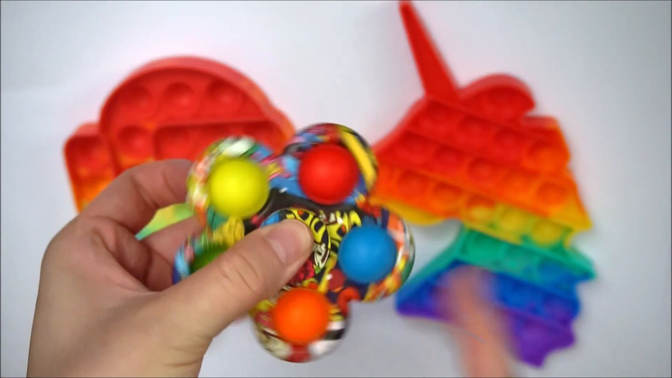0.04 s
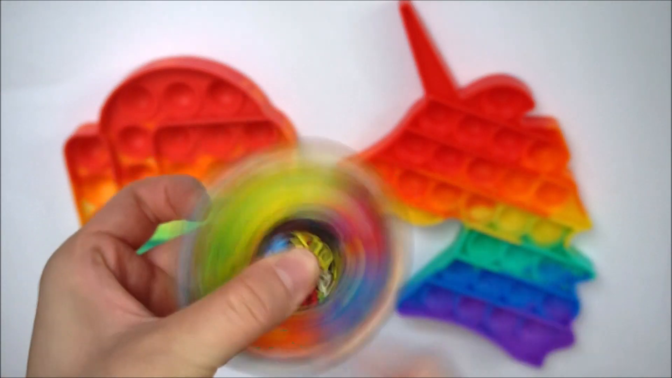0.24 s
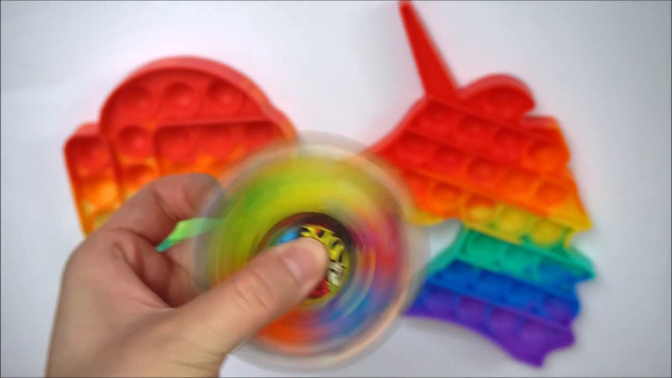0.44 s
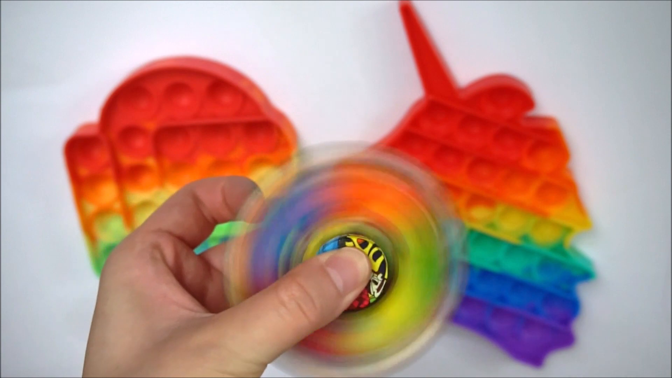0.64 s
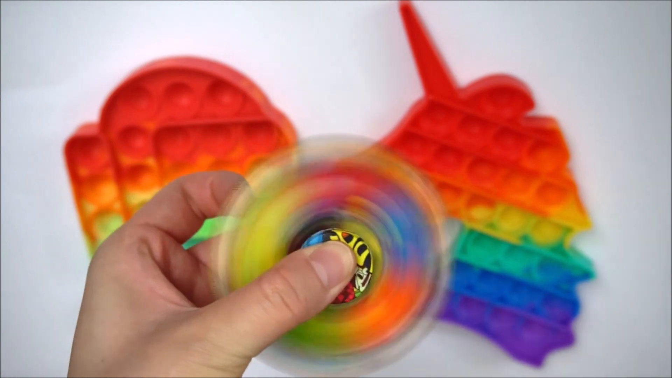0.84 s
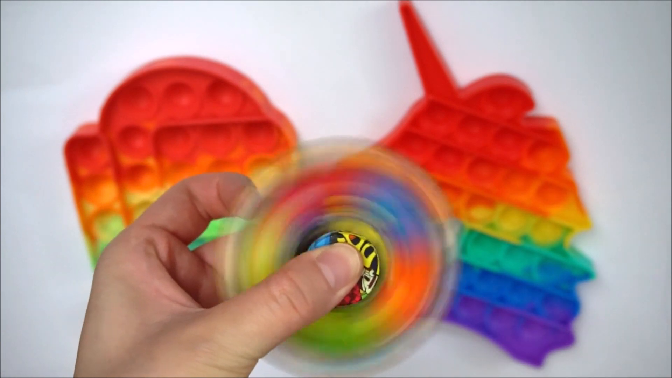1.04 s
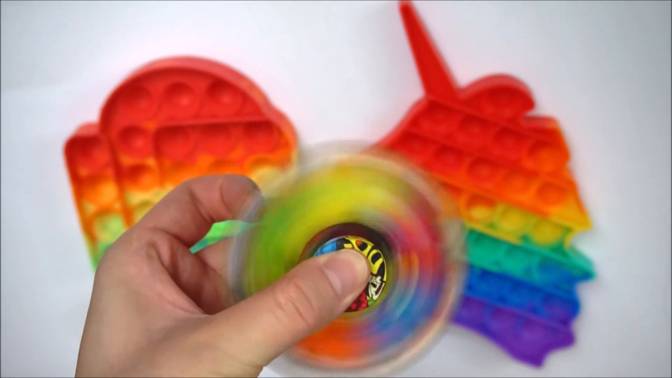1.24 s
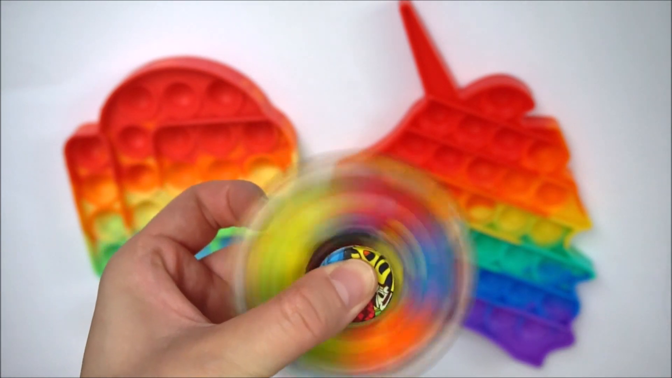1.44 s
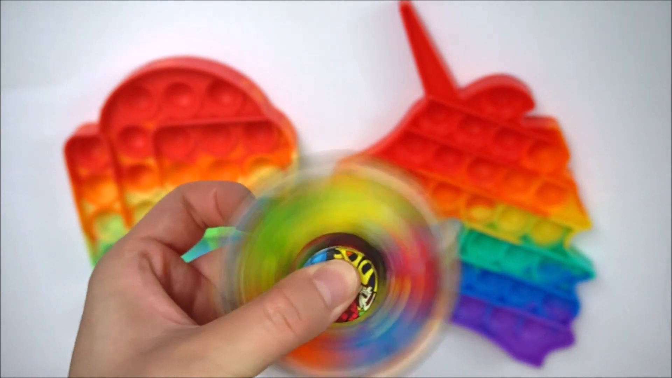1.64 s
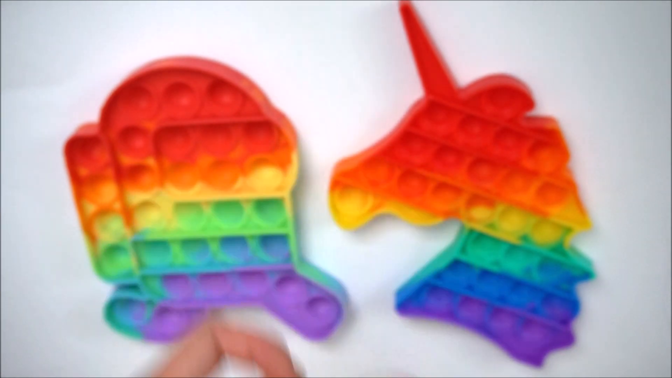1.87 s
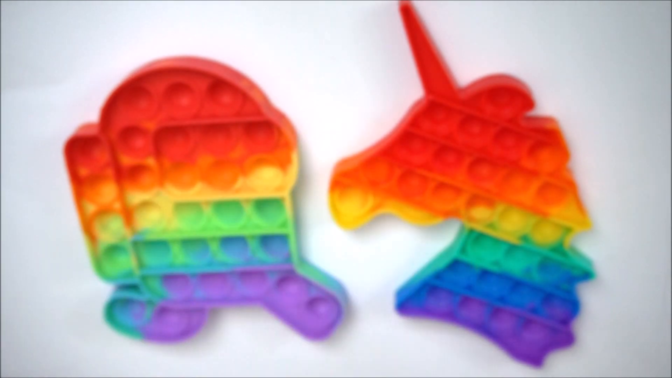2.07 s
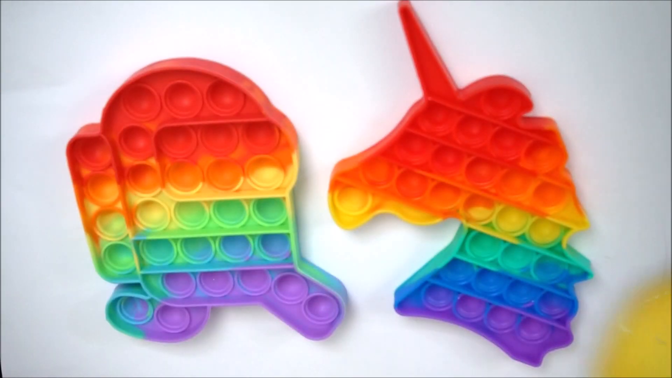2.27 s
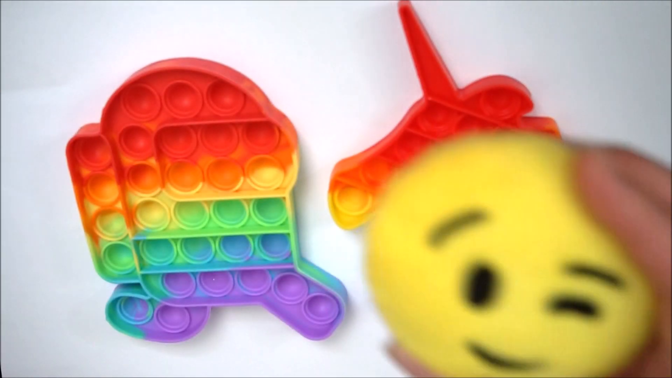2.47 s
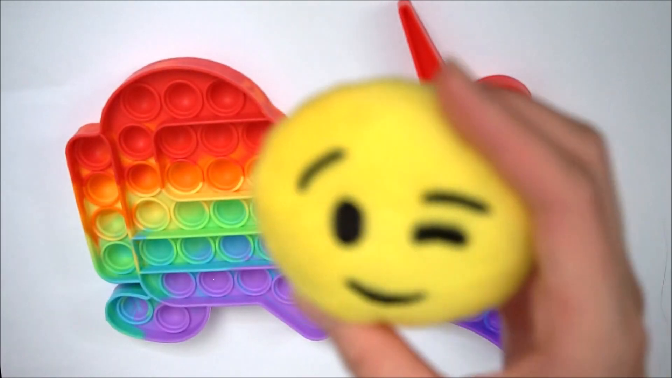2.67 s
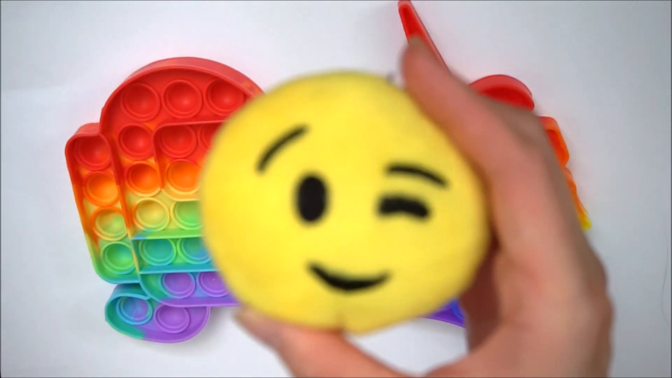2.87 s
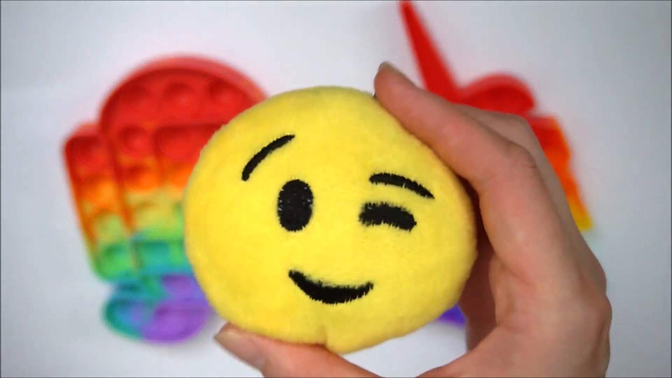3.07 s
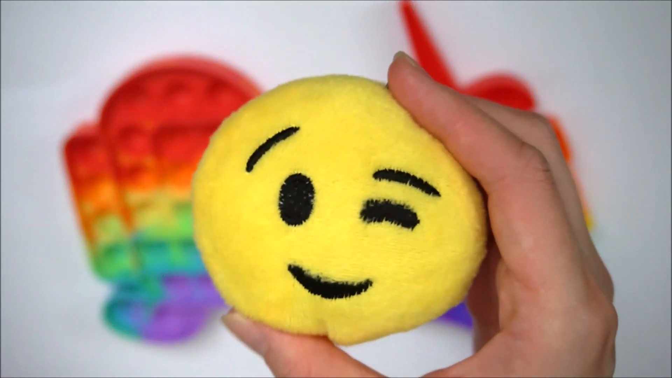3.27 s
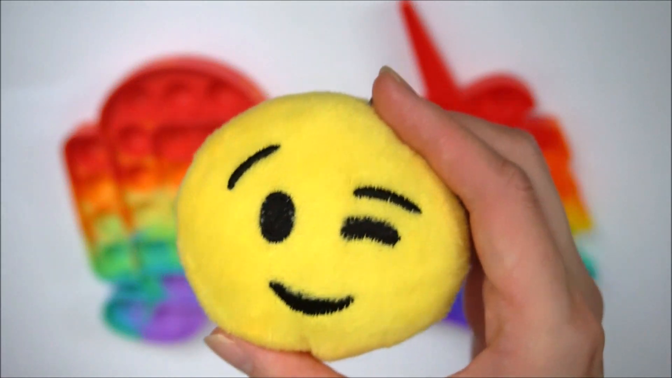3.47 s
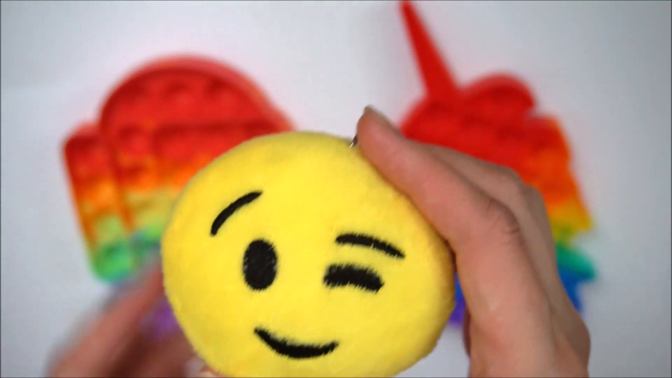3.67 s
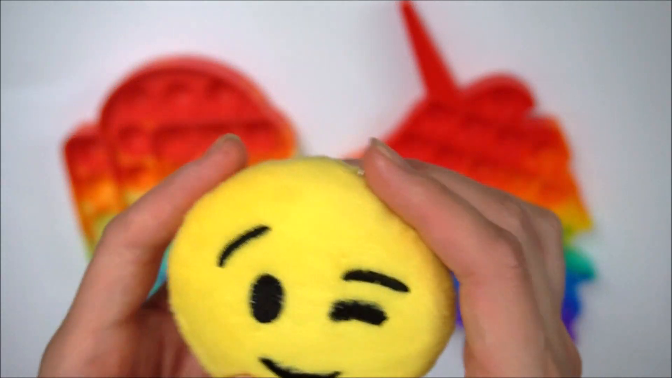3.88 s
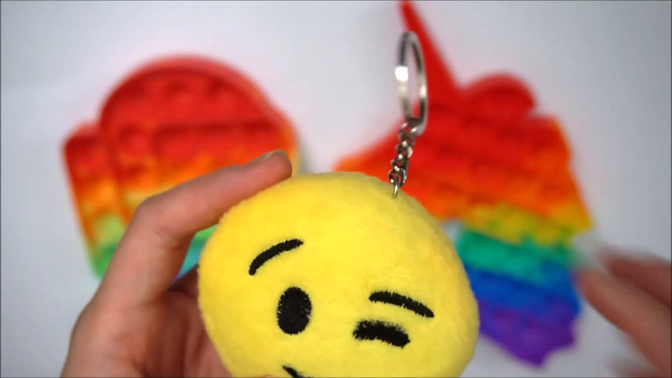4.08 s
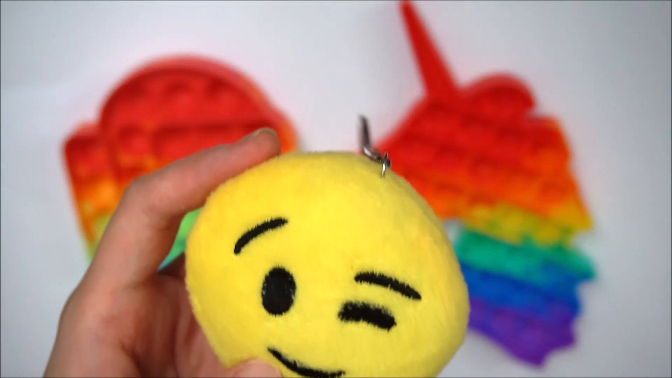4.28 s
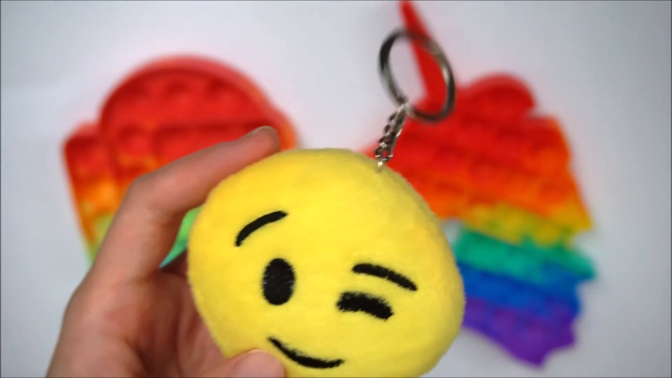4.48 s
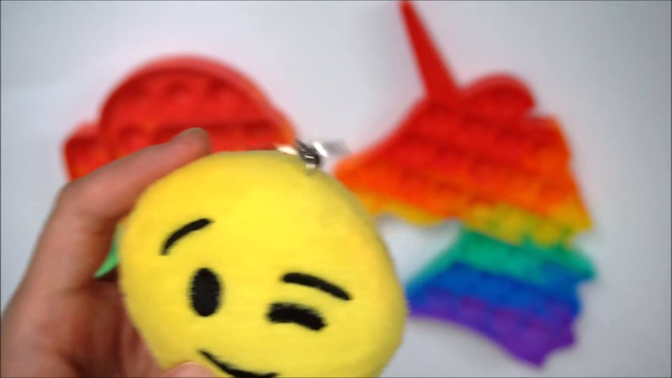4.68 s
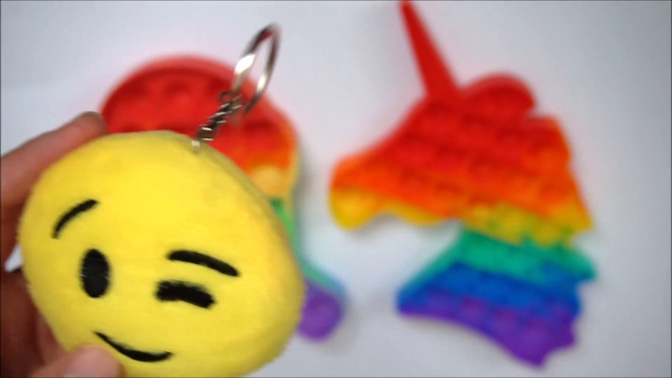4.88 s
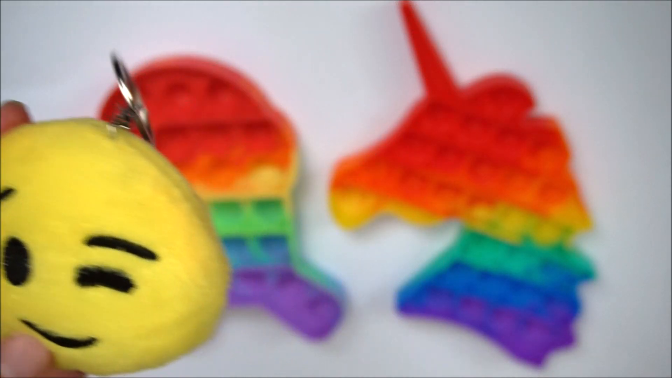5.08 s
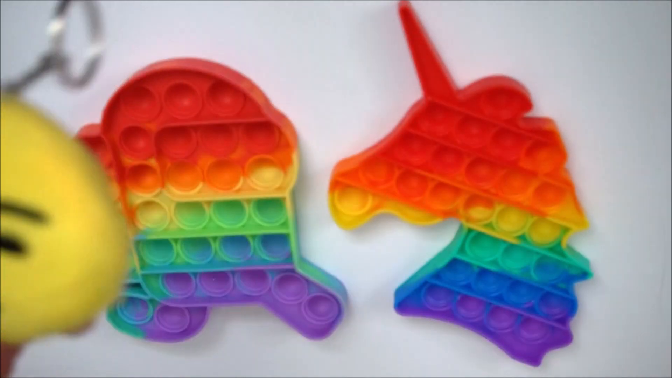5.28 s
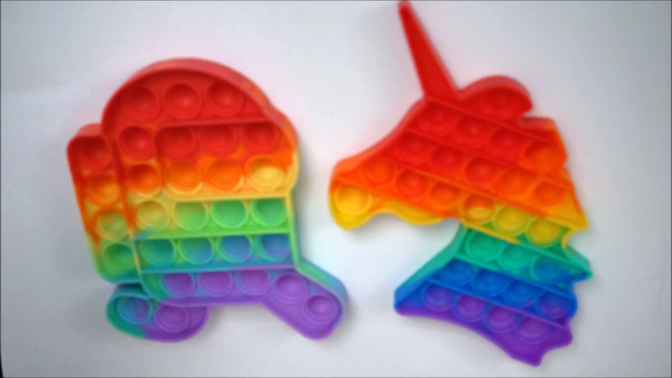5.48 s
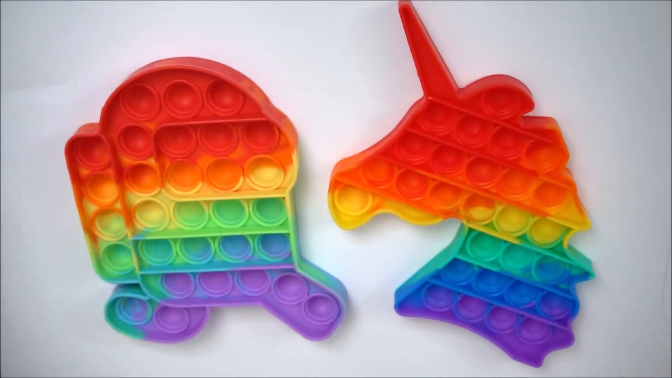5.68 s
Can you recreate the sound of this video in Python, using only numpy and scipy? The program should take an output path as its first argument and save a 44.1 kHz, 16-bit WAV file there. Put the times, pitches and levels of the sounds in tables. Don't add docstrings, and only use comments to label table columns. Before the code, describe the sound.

A plastic fidget spinner is flicked with sharp clicks, whirs and rattles for two seconds, thuds onto a table, then plush rustles faintly.

```python
import sys
import numpy as np
from scipy import signal
from scipy.io import wavfile
from scipy.ndimage import uniform_filter1d

SR = 44100
rng = np.random.default_rng(int(sys.argv[2]) if len(sys.argv) > 2 else 0)


def dump(signal):
    limited = np.clip(np.atleast_2d(signal).T, -1, 1)
    pcm = np.round(limited * 32767).astype(np.int16)
    wavfile.write(sys.argv[1], SR, pcm)


def field_ratio(decibels):
    return 10 ** (np.asarray(decibels, dtype=float) / 20)


N = 252252

# pitch_hz, level_db
ROOM_COLOUR = [(15, -38), (25, -22), (39, -5.5), (114, -2.5), (259, -9), (553, -12.5), (706, -15),
               (854, -14.5), (1180, -19), (1640, -19.5), (1980, -21), (4360, -24.5), (8600, -27.5),
               (15200, -28), (16500, -55)]
# time_s, level_db
ROOM_SWELL = [(0.0, -0.5), (5.72, 0.5)]
# pitch_hz, side_over_middle_db
ROOM_WIDTH = [(60, -16), (130, -8), (290, -1), (640, 2), (1410, 3.5), (3100, 1), (6820, -0.5), (15000, 0.5)]
NEAR_WIDTH = [(60, -11), (110, -26), (200, -21), (380, -6), (700, -8), (1290, -21), (2380, -15),
              (4400, -12), (8120, -11.5), (15000, -8)]
# pitch_hz, level_db
ECHO_COLOUR = [(20, -40), (500, 0), (21000, -2)]

# pitch_hz, width_hz, level_db
TABLE_THUD = [(108.2, 21, 4.5), (155, 45, -3.5)]
TABLE_KNOCK = [(211, 82, 2), (270, 140, -13), (368, 110, -2), (480, 68, -35)]
# crest_s, wobble_db, hand_stops_it_s
PUSHES = [
    (2.21, -37, 2.2),
    (2.3, -39, 2.62),
    (2.54, -39.5, 2.72),
    (2.81, -49.5, 3.04),
    (2.95, -54, 3.0),
    (3.05, -55, 3.09),
    (5.36, -49, 5.7),
]
# crest_s, thud_db, knock_over_thud_db, die_away_s (time to fall 60 dB)
JOLTS = [
    (2.13, -49, 12.5, 0.79),
    (2.192, -32.5, 5, 0.43),
    (2.29, -42.5, -11, 0.25),
    (2.401, -46.5, -6, 1),
    (2.54, -56, -1.5, 1),
    (2.71, -59, 9, 0.23),
    (3.05, -65, -17, 0.27),
    (5.355, -56, 8, 0.23),
    (5.4, -53.5, -3, 0.96),
    (5.64, -57, -2, .5),
]

# pitch_hz, level_db
FINE_COLOUR = [(2940, -22), (5000, -13), (6780, -2), (8490, -2), (13300, -3), (15900, -4), (16300, -14),
               (16500, -47)]
COARSE_COLOUR = [(290, -24), (500, -8), (662, -6.5), (860, -8.5), (1380, -14.5), (1620, -12.5), (2980, -13),
                 (5500, -18), (7150, -30), (12100, -120)]
# middle_s, length_s, fine_db, coarse_over_fine_db
STROKES = [(2.254, 0.18, -56.5, -3.5), (2.346, 0.14, -50.5, -13), (2.47, 0.18, -55, -9),
           (2.574, 0.15, -54.5, -13), (2.69, 0.24, -51, -18), (2.858, .18, -60, -18.5),
           (3.215, 0.2, -58, -1), (3.932, 0.35, -63.5, 0), (4.273, 0.072, -74, 11),
           (4.402, 0.062, -64, -14), (4.48, 0.26, -69, 10), (4.73, 0.19, -64, 7.5), (4.821, 0.1, -64, 6),
           (4.98, .12, -64, -1), (5.15, 0.18, -62, -6), (5.304, 0.089, -63, -6), (5.502, 0.32, -69, -19)]
# start_s, end_s
HOLDS = [(2.2, 3.4), (4.3, 5.6)]

# start_s, peak_db, pitch_hz, die_away_s
TAPS = [(.015, -53, 6140, 0.17), (.155, -41, 3600, 0.022), (.258, -22, 8600, .11), (.2705, -21, 4250, 0.04),
        (2.232, -30, 6700, 0.01), (2.243, -36, 7000, 0.058), (3.155, -40, 2100, 0.026),
        (2.232, -37.5, 3360, 0.017), (3.166, -42, 2890, .04), (3.176, -36.5, 2470, 0.048),
        (3.188, -46, 3160, .035), (3.213, -39.5, 2510, 0.065), (3.213, -50, 4400, .07),
        (4.455, -38.5, 406, 0.039), (4.455, -47, 955, 0.074)]
HOLLOW_BLOWS = [(.2458, -31, 277, 0.047), (.2462, -27, 480, 0.047), (.2462, -35, 750, .03),
                (.2462, -38, 1100, .025), (.2692, -44, 520, .025), (.2692, -38, 784, 0.02),
                (.2692, -44, 1190, 0.022), (.2905, -39, 700, .06), (.313, -36, 860, 0.021),
                (.313, -40, 480, 0.037), (4.706, -45, 960, .08), (4.722, -38, 810, .09),
                (4.723, -39, 1150, 0.076), (4.721, -42.5, 1844, 0.057), (4.738, -34, 884, 0.067),
                (4.742, -46, 1624, 0.18), (4.76, -42, 880, .1), (4.82, -52, 1590, .07)]
LANDING_BLOWS = [(2.115, -39, 260, 0.21), (2.16, -29, 150.3, 0.15), (2.168, -31.5, 202.6, 0.19),
                 (2.19, -36, 115, .09), (2.19, -43, 305, 0.088), (2.208, -25.5, 219, 0.13),
                 (2.262, -33, 88, 0.17), (2.268, -32, 184.3, 0.16), (2.45, -45.5, 257, 0.15),
                 (2.94, -50, 105, .2), (3.02, -43, 93, 0.18)]
ROUGH_BLOWS = [
    (2.12, -49, 437, 0.092),
    (2.125, -35, 140, .15),
    (2.172, -38, 366, 0.18),
    (2.175, -47, 446, 0.15),
    (3.175, -46, 430, 0.36),
    (3.18, -45, 4400, 0.16),
    (4.724, -47, 2450, 0.059),
    (4.725, -48, 1450, 0.07),
]

# start_s, peak_db, ring_hz, dull_body_over_crack_db
FLICK_CLICKS = [(.156, -48, 7780, 7.5), (.1699, -41.5, 9860, -1), (.2445, -24, 9000, -14),
                (.2463, -3.5, 9600, -7.5), (.248, -20, 9000, -7), (.2496, -9.5, 7500, -8),
                (.2515, -18, 7600, -10), (.2535, -19, 7900, -10), (.2665, -23, 8500, -22),
                (.2692, -3.5, 13200, -17), (.2708, -15.5, 8500, -15), (.2725, -9, 8600, -3),
                (.2742, -13, 9360, -11), (.2765, -18, 9000, -14), (.279, -24, 7940, -10),
                (.284, -20, 9000, -10), (.29, -19, 6800, -7), (.2915, -12, 6960, -9), (.294, -14, 6700, -8),
                (.3011, -12, 7560, -2), (.3035, -22, 7560, -5), (.3138, -14, 7300, -8.5),
                (.3165, -12, 7500, -1), (.3266, -17, 7700, -12)]
LATE_SPINNER_CLICKS = [(1.9225, -27, 13500, -45), (1.9995, -15, 13590, -30), (2.051, -17, 10400, -30),
                       (2.178, -32, 10100, -4), (2.1825, -24, 9700, -11), (2.2314, -27, 11700, -16),
                       (2.2421, -12.5, 7250, -24), (2.3555, -28, 9000, -7), (2.3987, -29, 8300, -7),
                       (2.4385, -37, 7850, -5), (2.4578, -36, 8700, -7), (2.4636, -21, 10300, -9),
                       (2.4707, -34, 8130, -18), (2.4932, -33, 7860, -7), (2.5425, -36, 6690, -9),
                       (2.5521, -33, 7500, -17), (2.5945, -35, 8650, -8)]
GRIP_CLICKS = [(3.154, -30.5, 11000, -18), (3.1574, -37, 9500, -10), (3.1662, -37, 8060, -7),
               (3.171, -40, 8000, -2), (3.1747, -29, 11800, -6), (3.1777, -21.5, 9600, -7),
               (3.1814, -34, 7940, -7), (3.184, -36, 7900, -5), (3.1865, -28, 8170, -8),
               (3.189, -27.5, 11000, -3), (3.1915, -33, 11000, -8), (3.1965, -38, 7540, -1),
               (3.2128, -34, 8100, -5), (3.2155, -40, 8100, -4), (3.2195, -45, 7000, -5),
               (3.2217, -41, 6470, 0), (3.2255, -46, 7000, -1)]
CHAIN_CLICKS = [(3.8931, -44.5, 5510, -5), (4.381, -45, 14000, -20), (4.4473, -42, 9950, -5),
                (4.4558, -41, 6450, -2), (4.483, -49, 9700, -6), (4.4637, -45, 6520, -2),
                (4.47, -38, 6640, -6), (4.4822, -37, 4500, -9), (4.7257, -42, 5300, 0),
                (4.9114, -46, 5700, -5), (4.9621, -37, 9700, -21), (4.9734, -44, 8770, -14),
                (5.6293, -42.5, 8890, -20)]
# pitch_hz, level_db
CRACK_COLOUR = [(3470, -13), (5900, 3.5), (6910, 2.5), (7520, 5), (9780, -7), (10900, -1), (11900, -9),
                (13100, 3), (16000, 0.5)]
DULL_COLOUR = [(88, -39), (150, -11), (455, -2), (768, 0), (1340, -20), (1660, -38), (1980, 2.5), (3450, 9),
               (4300, 9), (4900, 4), (6370, -8), (10800, -120)]

# time_s, level_db, turned_away (0 to 1), edge_ring_db
SPIN = [(.25, -44, 0.4, -28), (.3, -33, 0.42, -29), (.45, -29.5, 0.07, -23), (1.2, -29, 0.06, -12),
        (1.45, -29.5, 0.1, -8), (1.75, -30, 0.12, -7), (1.81, -31.5, 0.32, -6), (1.89, -31, .75, -3),
        (1.95, -31, 0.92, -8.5), (2.03, -33.5, 0.93, -15), (2.13, -38, 0.97, -16), (2.26, -49.5, 0.83, -23)]
# pitch_hz, width_hz, level_db
SHELL_TONES = [(2010, 152, 0), (2142, 120, 0.5), (2310, 350, 2), (2514, 530, -5.5)]
CAP_TONES = [(2770, 80, -10), (2830, 41, -1), (3216, 510, -0.5), (3670, 490, -8), (4400, 680, -6)]
BALL_TONES = [(5220, 1100, -12), (6090, 520, -1.5), (6450, 340, -0.5), (6800, 660, -4.5), (7300, 490, -0.5),
              (7600, 270, 5.5), (8100, 500, -4.5), (8680, 730, -4), (9700, 2500, -10), (12400, 1600, -10),
              (14700, 2100, -8), (15540, 1300, -8)]
HUB_TONES = [(354, 410, -9), (473, 376, -3), (736, 87, 2.5), (859, 82, -1), (1150, 245, -5)]
EDGE_TONES = [(2698, 250, -4), (2908, 210, -3.5)]
# pitch_hz, level_db
SIDE_COLOUR = [(150, -45), (250, -12), (386, -7.5), (421, -11), (493, -4), (1400, -21), (1880, -8),
               (2400, -30), (3170, -3.5), (4410, -6), (4990, -10.5), (7440, 0), (11900, -4.5),
               (13900, -0.5), (16000, -6.5)]
# start_s, peak_db
BALL_KNOCKS = [(0.3474, -18.5), (0.4559, -14.5), (0.4994, -20), (0.6025, -28), (0.6264, -20),
               (0.6484, -15.5), (0.6954, -20), (0.7224, -15), (0.8154, -26), (0.8579, -16), (0.8824, -16),
               (0.9034, -22), (0.9964, -17), (1.0206, -14), (1.0889, -17), (1.1134, -18), (1.1374, -18),
               (1.1574, -18), (1.1804, -25), (1.2376, -11), (1.2534, -26), (1.276, -19), (1.3154, -27),
               (1.3314, -18), (1.3964, -17), (1.4094, -22), (1.4214, -17), (1.4444, -16), (1.4594, -20),
               (1.493, -13.5), (1.5534, -16.5), (1.6167, -14), (1.6534, -17), (1.6894, -22), (1.7145, -22),
               (1.7424, -17), (1.8014, -13.5), (1.8347, -16), (1.8652, -16), (1.9034, -15.5), (1.9404, -14),
               (1.9714, -12), (1.9774, -21), (1.9844, -20), (2.0164, -17), (2.0284, -16), (2.0744, -31),
               (2.0834, -21), (2.1134, -24), (2.1324, -18)]


def evened(x):
    return x / np.sqrt(np.mean(x ** 2) + 1e-20)


def curve(rows, outside=-120.):
    s, *columns = np.transpose(rows)
    return [np.interp(np.arange(N) / SR, s, column, outside, outside) for column in columns]


def crest(s, rise, t60):
    t = np.arange(N) / SR - s
    swell = np.cos(np.pi / 2 * np.clip(t / rise, -1, 0)) ** 2
    return swell * field_ratio(-60 * np.maximum(t, 0) / t60)


def colour(x, points):
    hz, db = np.transpose(points)
    grid_hz = abs(np.fft.fftfreq(8192, 1 / SR))
    gain_db = np.interp(np.log(grid_hz + 1), np.log(hz), db, -70, -70)
    response = np.exp(np.conj(signal.hilbert(np.log(field_ratio(gain_db)))))
    taps = np.fft.ifft(response).real[:4096]
    return signal.oaconvolve(x, taps)[:len(x)]


def widened(x, points):
    return colour(x, [(20, points[0][1]), *points, (21000, points[-1][1])])


def pan(left_over_right_db):
    return field_ratio(left_over_right_db * np.array([[.5], [-.5]]))


def resonate(x, hz, width):
    r = np.exp(-np.pi * abs(width) / SR)
    return 2 * signal.lfilter([1 - r], [1, -r * np.exp(2j * np.pi * hz / SR)], x + 0j).real


def body(x, modes, sway_db=0):
    sway = rng.standard_normal((len(modes), len(x) // 256 + 2))
    sway = sway_db * evened(uniform_filter1d(sway, 20))
    at = np.arange(len(x)) / 256
    out = np.zeros(len(x))
    for k, (hz, width, db) in enumerate(modes):
        ring = resonate(resonate(x, hz, 1.21 * width), hz, 1.21 * width)
        level_db = db + np.interp(at, np.arange(len(sway[k])), sway[k])
        out += (-1) ** k * field_ratio(level_db) * ring
    return evened(out)


def grains(per_s, spread_db):
    draw = rng.random((N, 3))
    sign = np.sign(draw[:, 0] - .5)
    size = field_ratio(-spread_db * np.log(1.006 - draw[:, 1]))
    return sign * size * (draw[:, 2] < per_s / SR)


def add(mix, s, sound):
    part = mix[..., round(s * SR):][..., :sound.shape[-1]]
    part += sound[..., :part.shape[-1]]


def tail(t60, length):
    count = int(length * SR)
    x = rng.standard_normal(count) * field_ratio(-60 * np.arange(count) / SR / t60)
    return x / np.linalg.norm(x)


def room():
    mid, side = (colour(x, ROOM_COLOUR) for x in rng.standard_normal((2, N)))
    side = widened(side, ROOM_WIDTH)
    level_db = -52 + curve(ROOM_SWELL, 0)[0]
    return field_ratio(level_db) * np.array([mid + side, mid - side]) / mid.std()


def table():
    wobble_hz, wobble_rise_s, wobble_t60_s = 71.1, 0.073, 1.7
    hand_stop_s, jolt_rise_s = 0.024, 0.048
    shake, t = rng.standard_normal(N), np.arange(N) / SR
    thud, knock = body(shake, TABLE_THUD), body(shake, TABLE_KNOCK)
    swing = np.zeros(N)
    for s, db, stop in PUSHES:
        damping = np.clip((stop - t) / hand_stop_s, 0, 1)
        push = field_ratio(db) * crest(s, wobble_rise_s, wobble_t60_s) * damping
        swing = np.maximum(swing, push)
    out = np.sqrt(2) * swing * np.sin(2 * np.pi * wobble_hz * t)
    for s, db, knock_db, t60 in JOLTS:
        jolt = crest(s, jolt_rise_s, t60)
        out += field_ratio(db) * jolt * (thud + field_ratio(knock_db - 2.5) * jolt * knock)
    return out


def rustle():
    fine = evened(colour(grains(7000, 2.3), FINE_COLOUR))
    coarse = evened(colour(grains(6000, 1.0), COARSE_COLOUR))
    t = np.arange(N) / SR
    held = sum(1. * (t > start) * (t < end) for start, end in HOLDS)
    held = uniform_filter1d(held, SR // 5)
    out = held * field_ratio(-66) * (fine + coarse)
    for s, length, db, coarse_db in STROKES:
        stroke = np.cos(np.pi * np.clip((t - s) / length, -.5, .5)) ** 2
        out += field_ratio(db) * stroke * (fine + field_ratio(coarse_db) * coarse)
    return out


def blows_of(rows, rise_share, rough):
    out, t = np.zeros(N), np.arange(9000) / SR
    for s, db, hz, t60 in rows:
        noise = body(rng.standard_normal(9000), [(hz, 0.3 * hz, 0)])
        note = (1 - rough) * np.sin(2 * np.pi * hz * t) + 0.91 * rough * noise
        rise = rise_share * t60
        swell = np.sin(np.pi / 2 * np.minimum(t / rise, 1)) ** 2
        add(out, s, field_ratio(db - 60 * np.maximum(t - rise, 0) / t60) * swell * note)
    return out


def soft_blows():
    return (blows_of(TAPS, rise_share=0.091, rough=0.64)
            + blows_of(HOLLOW_BLOWS, rise_share=0.064, rough=0.34)
            + blows_of(LANDING_BLOWS, rise_share=0.23, rough=0.21)
            + blows_of(ROUGH_BLOWS, rise_share=0.054, rough=0.58))


def clicks_of(rows, left_over_right_db, t60, crack_db):
    out, t = np.zeros((2, N)), np.arange(3000) / SR
    rattle = field_ratio(-60 * t / max(t60, .004))
    snap = 0.8 * field_ratio(-60 * t / 0.0031)
    attack = np.minimum(t / 0.000053, 1)
    for s, db, hz, dull_db in rows:
        burst = rng.standard_normal(3000) * (rattle + snap) * attack
        ring = evened(resonate(burst, hz, 700))
        crack = field_ratio(crack_db) * evened(colour(burst, CRACK_COLOUR)) + ring
        dull = colour(burst, DULL_COLOUR)
        sound = crack / abs(crack).max() + field_ratio(dull_db) * dull / abs(dull).max()
        add(out, s + .0006, field_ratio(db) * pan(left_over_right_db) * sound)
    return out


def clicks():
    return (clicks_of(FLICK_CLICKS, left_over_right_db=-1.7, t60=0.015, crack_db=0.3)
            + clicks_of(LATE_SPINNER_CLICKS, left_over_right_db=-3.3, t60=0.011, crack_db=-0.33)
            + clicks_of(GRIP_CLICKS, left_over_right_db=-4, t60=0.022, crack_db=-2.5)
            + clicks_of(CHAIN_CLICKS, left_over_right_db=12, t60=.015, crack_db=-4))


def ball_ticks(away):
    ball_pass_hz, pass_depth, pass_jitter = 87.8, 0.11, 0.1544
    clump_db, clump_s = 1.3, .004
    wander = evened(uniform_filter1d(rng.standard_normal(N), 2000))
    phase = 2 * np.pi * np.cumsum(ball_pass_hz * (1 + pass_jitter * wander)) / SR
    clumps = evened(uniform_filter1d(rng.standard_normal(N), int(clump_s * SR)))
    throb = (1 + pass_depth * np.sin(phase)) * field_ratio(clump_db * clumps)
    ticks = grains(6000, 3 + 0.18 * away)
    return evened(ticks + 1.03 * rng.standard_normal(N)) * throb


def cage_knocks(level_db, away):
    first_s, turns_per_s, turn_jitter = .318, 42.7, .12
    knock_db, spread_db = 5, 0.5
    boost_db = 19
    events = [(s, db - level_db[round(s * SR)] + boost_db - 6) for s, db in BALL_KNOCKS]
    for turn in range(100):
        late, louder = rng.standard_normal(2)
        s = first_s + (turn + turn_jitter * late) / turns_per_s
        db = knock_db + spread_db * np.clip(louder, -3, 1.2)
        events.append((s, db + boost_db - 8 * away[round(s * SR)]))
    knocks = np.zeros(N)
    for s, db in events:
        add(knocks, s, field_ratio(db) * tail(0.0083, .006) * np.minimum(np.arange(264) / 8, 1))
    return knocks


def spinner():
    cap_db, balls_db, hub_db = -2, 0.5, -13
    level_db, away, ring_db = curve(SPIN)
    away = np.clip(away, 0, 1)
    ticks, knocks = ball_ticks(away), cage_knocks(level_db, away)
    in_shell = ticks + 0.69 * knocks
    in_cap = ticks + 0.76 * knocks
    from_side = ticks + 0.73 * knocks
    in_balls = ticks + knocks
    facing = body(in_shell, SHELL_TONES, 0.44)
    facing += field_ratio(cap_db) * body(in_cap, CAP_TONES, 0.58)
    facing += field_ratio(balls_db) * body(in_balls, BALL_TONES, 0.92)
    hub = body(in_shell + 1.1 * rng.standard_normal(N), HUB_TONES)
    facing = evened(facing + field_ratio(hub_db) * hub)
    aside = evened(colour(from_side * rng.choice([-1, 1], N), SIDE_COLOUR))
    turned = np.sqrt(1 - away) * facing + np.sqrt(away) * aside
    edge_ring = body(in_shell, EDGE_TONES, 1.9)
    return field_ratio(level_db) * (turned + field_ratio(ring_db) * edge_ring)


def scene():
    echo_db, echo_t60_s, hand_sways_per_s = -16, .2, 2.3
    near = clicks() + pan(-0.6) * spinner() + soft_blows() + rustle()
    echo = []
    for x in near:
        reflections = np.r_[np.zeros(150), tail(echo_t60_s, .3)]
        echo.append(signal.oaconvolve(colour(x, ECHO_COLOUR), reflections)[:N])
    sway = 2 * np.pi * hand_sways_per_s * np.arange(N) / SR
    side = np.zeros(N)
    for turn in (np.cos, np.sin):
        side += signal.oaconvolve(near.mean(0) * turn(sway), tail(.12, .12))[:N]
    side = widened(side, NEAR_WIDTH)
    return near + field_ratio(echo_db) * np.array(echo) + np.array([side, -side]) + table() + room()


def top_cut(x):
    return signal.sosfilt(signal.butter(12, 16990, fs=SR, output="sos"), x)


def record(dry):
    upper_edge_hz = 15770
    low_pass = signal.firwin(1535, upper_edge_hz, window=("kaiser", 9), fs=SR)
    limited = signal.oaconvolve(dry, low_pass[None], "same")
    return top_cut(limited)


dry = scene()
out = record(dry)
dump(out)
```